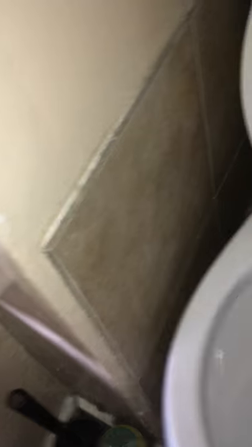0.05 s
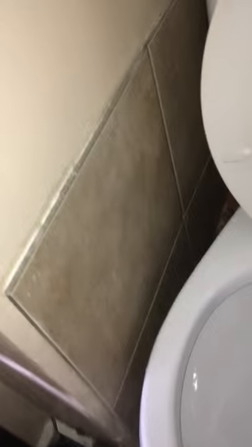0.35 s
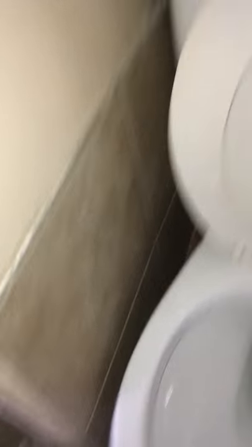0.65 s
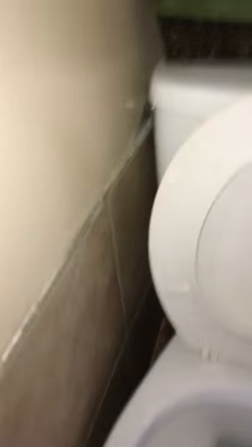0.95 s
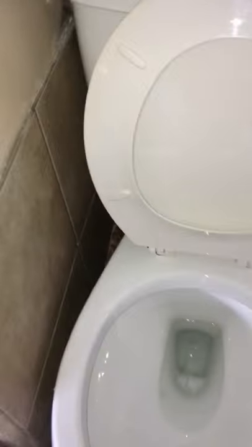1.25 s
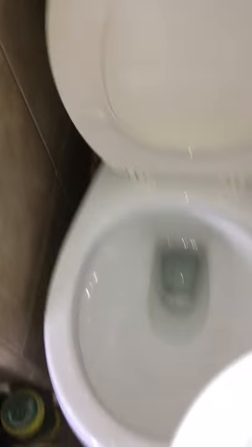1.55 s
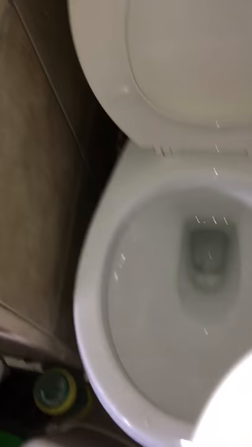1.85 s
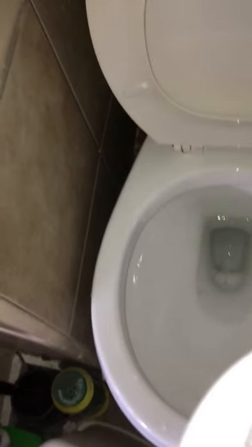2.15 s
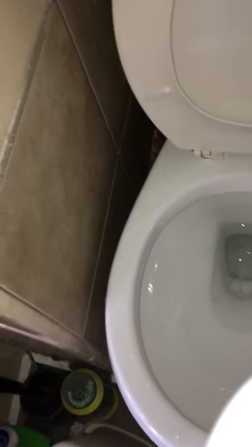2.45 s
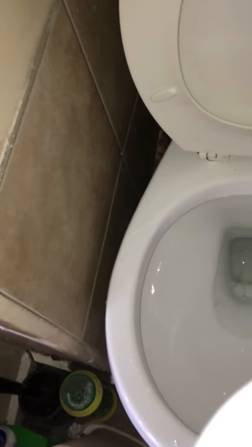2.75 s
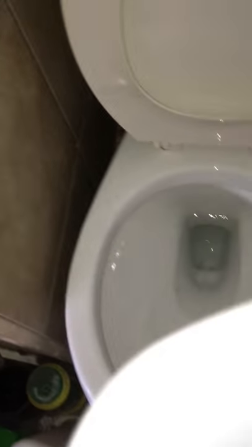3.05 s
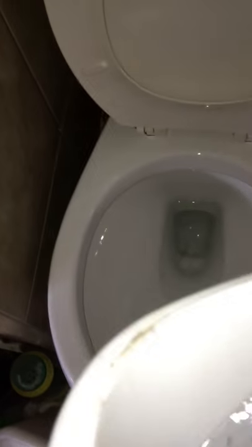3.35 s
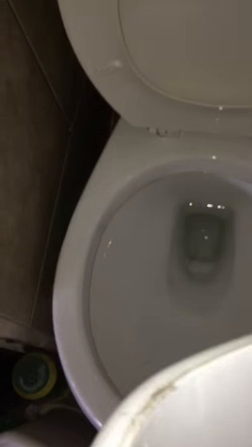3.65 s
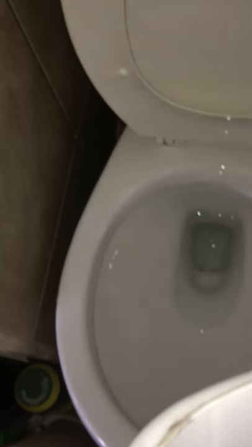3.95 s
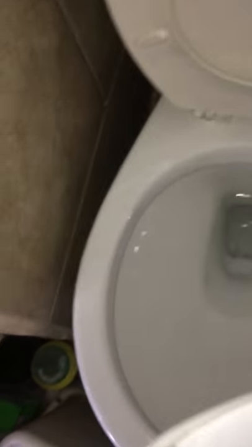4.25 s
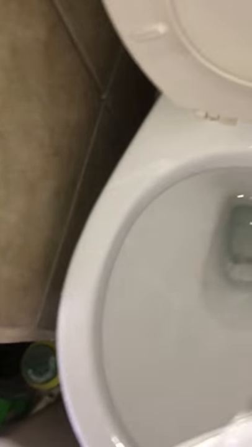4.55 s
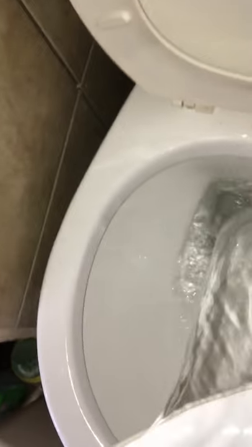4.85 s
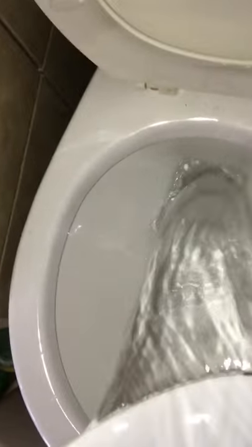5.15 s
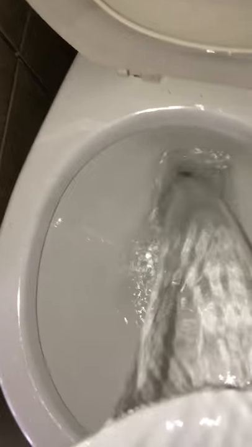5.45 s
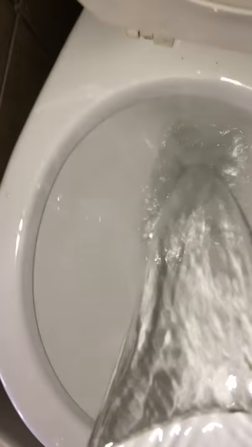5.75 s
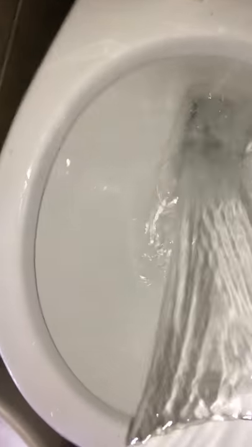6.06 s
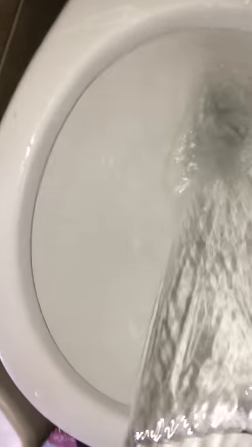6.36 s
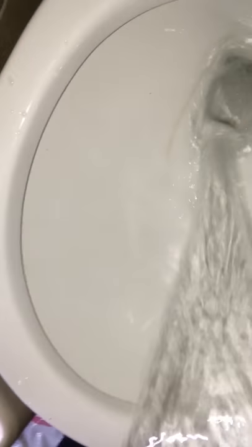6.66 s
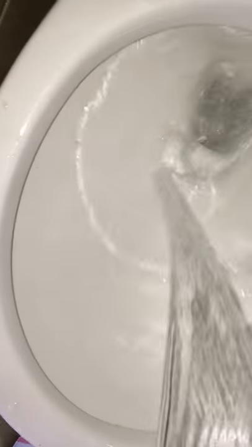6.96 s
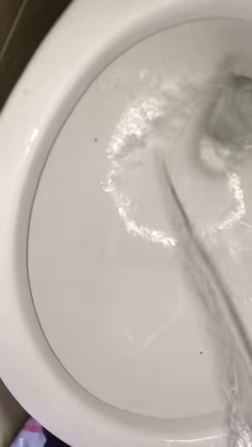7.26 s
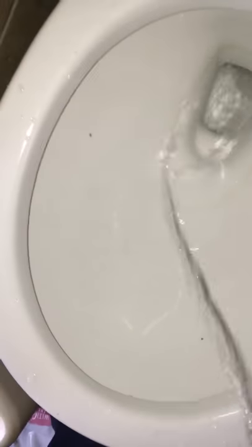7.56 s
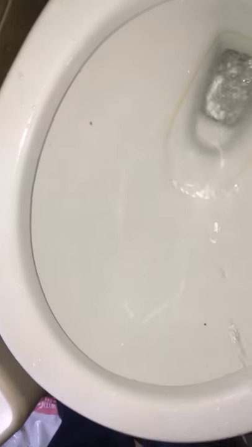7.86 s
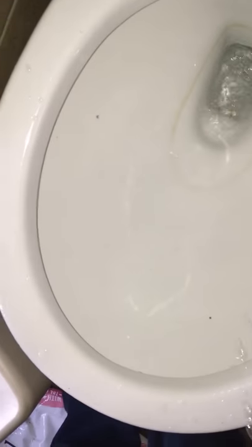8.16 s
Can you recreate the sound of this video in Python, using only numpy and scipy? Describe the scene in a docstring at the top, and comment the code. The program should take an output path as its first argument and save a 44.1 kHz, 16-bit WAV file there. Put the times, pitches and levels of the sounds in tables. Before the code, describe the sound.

A small tiled bathroom is quiet at first, with a low room rumble and a very faint rustle. A muffled engine drones outside, loudest around 2 seconds, then slowly draws away. Far traffic and a few faint chirps sit beneath it. From about 3.5 to 4.3 seconds a plastic bucket ticks and rubs softly as it tilts. The first drops smack the porcelain at 4.7 seconds, and a loud, close rush of water plunges into the toilet, splashing, spraying and bubbling with a short bright echo. Low glugs and drain rumble join around 5.5 seconds. The pour eases near 6 seconds, then swells again. From about 7 to 8 seconds the drain gulps air in loud, hollow glugs that ring the bowl, while the stream thins to a dribble and a few last drips.

```python
"""A small tiled bathroom: a bucket of water is tipped into the toilet while an engine drones outdoors.
The bucket creaks as it tilts; the sheet of water slaps the porcelain, sprays and beats bubbles
into the pool. The trap gulps air in loud glugs that ring the bowl, and the pour thins to a dribble.
A brief opening rustle, far traffic, a few faint chirps and soft room tone sit underneath."""
import sys
import numpy as np
from scipy import signal
from scipy.fft import rfft, irfft
from scipy.io import wavfile
from scipy.ndimage import uniform_filter1d

SR = 44100
rng = np.random.default_rng(int(sys.argv[2]) if len(sys.argv) > 2 else 0)


def materialize(psi):
    """Save the field psi as 16-bit PCM at rate SR to the path in sys.argv[1].

    A 1-D psi becomes a single channel; in a 2-D psi each row is a channel.
    """
    bounded = np.clip(np.atleast_2d(psi).T, -1, 1)
    quanta = np.round(bounded * 32767).astype(np.int16)
    wavfile.write(sys.argv[1], SR, quanta)


N = 362061
TIME = np.arange(N) / SR
CUTOFF_HZ = 16000


# the pour swells, eases, swells again and runs out: (time [s], bubbling [dB], spray [dB], churn [dB])
POUR = [(4.83, -38.5, -33.5, -47), (5.0, -32, -35, -41), (5.35, -31, -32, -39), (5.72, -34, -35, -33),
        (5.9, -35.5, -38, -42), (6.1, -37, -40, -39.5), (6.35, -32, -32.5, -32.5), (6.55, -31.5, -37, -33),
        (6.9, -32, -29, -35), (7.25, -33.5, -29.5, -35.5), (7.45, -36.5, -31, -43.5),
        (7.62, -37, -33.5, -42), (7.72, -46.5, -43.5, -50), (7.95, -49.5, -46.5, -52),
        (8.05, -58.5, -61, -63), (8.21, -54, -60, -60)]
# gobs slop over the bucket's lip: (time [s], length [s], bubbling [dB], spray [dB])
GOBS = [(4.831, 0.041, -32, -31.5), (4.878, 0.0087, -27.5, -31.5), (5.305, 0.087, -32, -34),
        (5.377, 0.0075, -32, -28.5), (5.74, 0.061, -34.5, -50), (5.85, 0.021, -40.5, -28),
        (6.17, 0.069, -33, -43), (6.42, 0.059, -29, -35.5), (6.78, 0.059, -27.5, -30.5),
        (7.14, 0.036, -37.5, -29), (7.456, 0.0039, -45, -23.5), (7.535, .05, -31.5, -38.5),
        (7.635, 0.033, -42.5, -33.5), (7.735, .035, -36, -47), (7.808, 0.0099, -35, -38),
        (7.847, .015, -46, -38), (7.917, 0.028, -38, -36), (8.124, .03, -46, -48.5)]
# the bowl's EQ on the slapping sheet: (frequency [Hz], gain [dB])
SHEET_EQ = [(300, -27), (850, -9), (1050, -1), (1260, 12.5), (1500, -8.5), (1850, 7.5), (2200, 5.5),
            (2800, 4.5), (3400, 4), (4200, -0.5), (5000, -2), (9000, -27)]
# chiming EQ of the small bubbles: (frequency [Hz], gain [dB])
CHIME_EQ = [(700, -9), (1080, 3.5), (1255, 2), (1480, -0.5), (1690, 3.5), (1850, 3.5), (2020, 4.5),
            (2195, 1.5), (2400, 6), (2700, 7.5), (3400, 5.5), (4200, 4), (4900, -1)]
def splash():
    """The stream shatters on porcelain and beats small bubbles into the pool; more water, more drops."""
    bubbling_db, spray_db, _ = in_time(POUR)
    gobs = swells(GOBS, attack_s=.0034, release_s=.06)
    bubbling, spraying = np.hypot(from_db([bubbling_db, spray_db]), gobs)
    density = 2600 * bubbling / from_db(-32)   # full flow is -32 dB
    tilt_db = -.43 + .54 * (spray_db - bubbling_db)   # per octave; brighter on bare porcelain
    clumps = from_db(1.42 * drift(55))   # the water arrives in lumps
    fizz = bubble_cloud(.2 * density, 7893, octaves=.6, cycles=30, spread_db=8, rise=.02)
    sheet = evened(colour(impacts(2 * density, spread_db=2.5) * clumps, SHEET_EQ))
    bubbles = bubble_cloud(.3 * density, 1964.48, octaves=.55, cycles=30, spread_db=5, rise=.03)
    bubbles = evened(colour(bubbles, CHIME_EQ))
    top = spraying * (from_db(-1) * spray(density, tilt_db) * clumps + from_db(-12.5) * fizz)
    body = bubbling * (from_db(-2.5) * bubbles + from_db(-5) * sheet)
    return gate(POUR) * (top + body)


# sizzle of the spray: (frequency [Hz], gain [dB])
SPRAY_EQ = [(900, -11.5), (2000, -11), (3000, 0), (4100, 3.5), (4800, -5), (5700, 3), (6700, 3.5),
            (7700, -2), (9000, 3.5), (10400, -2), (11400, 2.5), (13000, 2.5), (15800, 0.5), (17500, -89)]
def spray(density, tilt_db):
    """Drops burst with a short crackle: big ones across the treble, small ones each in its own band."""
    out = 0
    big_drops = impacts(.6 * density, spread_db=3) ** 2
    edges = np.geomspace(1500, CUTOFF_HZ, 11)
    decay = np.exp(-1 / (.0013 * SR))   # a drop takes a moment to spread
    for low, high in zip(edges, edges[1:]):
        energy = .4 * big_drops + impacts(.4 * density, spread_db=5) ** 2 + .001
        crackle = np.sqrt(signal.lfilter([1], [1, -decay], energy)) * rng.standard_normal(N)
        band = butter(crackle, 2, [low, high], "band")
        out = out + band * from_db(tilt_db * np.log2(high / 10000))
    return evened(colour(out, SPRAY_EQ))


# big air pockets: (time [s], relative level [dB], pitch [Hz], nominal decay [s], knock [dB])
GLUGS = [(5.428, -22, 191, .06, -53), (5.529, -10, 125.2, 0.07, -47), (5.724, -21.5, 130.1, .065, -28.5),
         (5.838, -18, 188, .066, -46.5), (6.06, -20.5, 190, 0.043, -43), (6.419, -22.5, 424, 0.04, -20),
         (6.904, -26, 570.6, .022, -21.5), (6.938, -14, 276.6, 0.037, -47.5),
         (6.955, -16.5, 313, 0.16, -24), (7.021, -10.5, 271, 0.06, -23), (7.030, -6.5, 263, 0.028, -39),
         (7.057, -7, 372, 0.024, -16), (7.068, -8.5, 373, .034, -21), (7.086, -3, 330, 0.021, -22.5),
         (7.094, -14, 570, 0.043, -27), (7.176, -21, 308.3, 0.066, -20.5), (7.385, -44, 454, 0.032, -22),
         (7.447, -15.5, 243.8, 0.032, -42), (7.534, -5, 272, 0.038, -39), (7.554, -1, 274, 0.022, -19.5),
         (7.574, -6.5, 311, 0.034, -11.5), (7.583, -9.5, 304, 0.023, -17.5), (7.641, -10, 337, 0.044, -17),
         (7.669, -6.5, 336, 0.031, -16), (7.712, -18, 310, 0.099, -33), (7.831, -15.5, 370, 0.036, -50),
         (7.863, -5.5, 317, .11, -12.5), (7.94, -13, 305.4, 0.014, -23), (8.056, -27.5, 162, 0.041, -51),
         (8.124, -23, 169, 0.054, -43)]
# bright single bubbles: (time [s], relative level [dB], pitch [Hz])
PLINKS = [(4.855, -22, 1320), (6.858, -23, 915), (6.906, -18.5, 1180), (7.015, -24, 1240),
          (7.404, -24, 1207), (7.463, -22.5, 2500), (7.472, -26.5, 2310), (7.733, -27.5, 1230),
          (7.741, -28.5, 1940), (7.809, -27.5, 2010), (7.943, -36.5, 4430), (7.949, -41, 5740),
          (8.102, -46, 599)]
def glugs():
    """Each air pocket throbs, heaves the pool and knocks the bowl; small bubbles plink on top."""
    out, knocks = np.zeros(N), np.zeros(N)
    for (s, db, hz, decay_s, knock_db), jitters in zip(GLUGS, rng.standard_normal((len(GLUGS), 4))):
        add(out, s, from_db(db) * bubble(hz, .69 * decay_s, rise=.02))
        add(out, s, from_db(db - 30.5) * bubble(hz=68, t60=.1, rise=.086))   # the heave
        for swing, jitter in enumerate(jitters):   # one knock on each early swing
            age = swing * (1 + .064 * jitter) / hz
            add(knocks, s + .001 + age, from_db([knock_db - 4 - 90 * age / decay_s]))
    for s, db, hz in PLINKS:
        add(out, s, from_db(db + 3.5) * bubble(hz, t60=.02, rise=.027))
    return out + bowl(knocks)


# the trap swallows in bouts: (time [s], length [s], churn [dB], drain rumble [dB])
GULPS = [(5.41, 0.57, -61, -31), (6.97, 0.27, -29.5, -31), (7.55, 0.069, -22, -26.5),
         (7.66, .11, -29.5, -42), (7.875, 0.053, -30.5, -28), (8.06, 0.16, -53.5, -31)]
# the bowl's hollow EQ on its bubbles: (frequency [Hz], gain [dB])
HOLLOW_EQ = [(120, -8), (215, -7.5), (255, -1.5), (316, -1), (358, -10.5), (403, 2), (500, -6), (586, -2),
             (660, -5), (735, 6.5), (800, -11), (880, -3), (1050, -8.5)]
# low end of the drain: (frequency [Hz], gain [dB])
DRAIN_EQ = [(20, -53), (45, -24), (75, -2), (110, 1.5), (160, -9), (205, 1.5), (260, -6.5), (400, -21),
            (1000, -65.5)]
def churn():
    """Larger bubbles tumble and sound the bowl over the drain's rumble; both swell as the trap gulps."""
    _, _, churn_db = in_time(POUR)
    steady = from_db([churn_db, churn_db - 6.5])   # between gulps the drain sits under the churn
    churning, rumbling = np.hypot(steady, swells(GULPS, attack_s=.038, release_s=.088))
    hollow = evened(bowl(impacts(500, spread_db=4)))
    tumbling = bubble_cloud(300, 453.4, octaves=.591, cycles=8.6, spread_db=3, rise=.071)
    tumbling = evened(colour(tumbling, HOLLOW_EQ))
    rumble = evened(colour(impacts(250, spread_db=4.5), DRAIN_EQ))
    pool = churning * (from_db(-4) * hollow + from_db(-3.5) * tumbling)
    return gate(POUR) * (pool + rumbling * from_db(-4) * rumble)


# air modes of the bowl and trap: (frequency [Hz], gain [dB], ring time [s])
BOWL_MODES = [(230, -14, 0.039), (316.4, -3, 0.11), (409, -12.5, 0.13), (582, -4, 0.056), (771, -2, 0.033),
              (864, -4.5, 0.031), (1240, -27, 0.028), (1233, 1, 0.06), (1838.6, -8, 0.044)]
def bowl(x):
    """The air in the bowl rings with whatever excites it; water damps the treble."""
    out, drive = 0, np.diff(x, prepend=0) + 1e-18
    for k, (hz, db, t60) in enumerate(BOWL_MODES):
        radius, angle = from_db(-60 / (t60 * SR)), 2 * np.pi * hz / SR
        ring = signal.lfilter([1], [1, -2 * radius * np.cos(angle), radius ** 2], drive)
        out = out + (-1) ** (k // 2) * from_db(db) * ring
    return butter(out, 4, 1400, "low")


# wet accents: (time [s], relative level [dB], band centre [Hz])
SLAPS = [(4.7506, -20, 11300), (4.7655, -24, 5500), (4.784, -35, 2140), (4.8004, -26, 9600),
         (4.813, -22, 7000), (4.8454, -22, 3340), (5.7775, -12, 6500), (5.869, -16, 5740),
         (6.0363, -18, 6214), (6.0803, -12.5, 6600), (6.1862, -14, 2960), (6.2058, -18, 3216),
         (6.5948, -6, 15300), (6.6649, -15, 4130), (7.0948, -15, 6260), (7.155, -15, 11780),
         (7.3427, -6, 12680), (7.4567, -5, 11300), (7.5257, -12.5, 14140), (7.551, -9, 14900),
         (7.656, -17, 6420), (7.7186, -19.5, 9180), (7.8073, -18.5, 11900), (7.9958, -34.5, 3510)]
def slaps():
    """Larger drops smack the porcelain, each with its own brightness."""
    out = np.zeros(N)
    for s, db, hz in SLAPS:
        band = [hz / 1.49, min(hz * 1.44, .45 * SR)]
        smack = burst(t60=.045)
        for _ in range(2):
            smack = butter(smack, 1, band, "band")
        add(out, s, from_db(db - 4.5) * smack / np.abs(smack).max())
    return out


# fader ride of the bubble plume: (time [s], level [dB])
PLUME = [(4.92, -45), (4.98, -31), (5.2, -35), (5.3, -44), (5.45, -53)]
def plume():
    """Plunging into still water, the sheet drives down a dense cloud of bubbles of nearly one size."""
    cloud = bubble_cloud(1500, 1900, octaves=.16, cycles=25, spread_db=3, rise=.02)
    return gate(PLUME) * from_db(in_time(PLUME)[0]) * cloud


def plunge():
    """The cavity behind the first sheet of water grows, so its ring dives in pitch."""
    start_hz, end_hz, growth_s, t60 = 515, 190, .0108, .092
    t = TIME[:int(t60 * SR)]
    hz = end_hz + (start_hz - end_hz) * np.exp(-t / growth_s)
    cycles = np.cumsum(hz) / SR
    envelope = (1 - np.exp(-cycles)) * from_db(-26 - 60 * (t / t60) ** 2)
    out = np.zeros(N)
    add(out, 4.867, np.sin(2 * np.pi * cycles) * envelope)
    return out


# the bucket shifts in the hand: (time [s], length [s], relative level [dB])
RUBS = [(3.6, 0.69, -68.5), (3.7, 0.049, -66), (3.86, 0.077, -61), (4.19, 0.038, -60.5)]
# dull body of the rub: (frequency [Hz], gain [dB])
RUB_EQ = [(30, -28), (90, -6), (180, 18), (300, 4), (600, -9.5), (1500, -15), (5000, -26), (16000, -24)]
# creaking ticks: (time [s], relative level [dB])
CREAKS = [(0.1436, -53.5), (0.2633, -53.5), (3.5688, -44.5), (3.6253, -50), (3.7198, -45), (3.7344, -51),
          (3.8332, -47), (3.8848, -52), (3.898, -42), (3.9073, -45), (3.9145, -40), (4.225, -54)]
# plastic tone of the ticks: (frequency [Hz], gain [dB])
PLASTIC_EQ = [(200, -40), (600, 17), (1100, -9), (1520, 14), (1850, -7), (2350, 14), (3000, -4),
              (4200, 2.5), (6500, -18), (8500, -4), (11000, -8), (16000, -9)]
def bucket():
    """The plastic ticks and rubs as it is tilted."""
    rubbing, = swells(RUBS, attack_s=.037, release_s=.13)
    friction = colour(impacts(900, spread_db=1.5), RUB_EQ)
    rub = friction / np.sqrt(np.mean(friction ** 2)) * rubbing * from_db(8.5)
    ticks = np.zeros(N)
    for s, db in CREAKS:
        add(ticks, s, from_db(db + 14.5) * burst(t60=.021))
    return rub + colour(ticks, PLASTIC_EQ)


# airy tone of the swish: (frequency [Hz], gain [dB])
SWISH_EQ = [(600, -13), (1600, 1), (2600, 0), (2900, 5), (3200, -1), (5000, -5), (6300, -6), (10000, -10),
            (15000, -5)]
def swish():
    """One soft brush of noise swells and fades while the bucket is lifted."""
    peak_s, width_s = 1.98, .19
    envelope = from_db(-67.5) * np.exp(-((TIME - peak_s) / width_s) ** 2)
    return envelope * colour(rng.standard_normal(N), SWISH_EQ)


# a slow pull through one gear, with a shift before and after: (time [s], speed [cycles/s])
ENGINE_SPEED = [(0, 17.5), (.25, 19.4), (.5, 13.9), (.7, 13.85), (1.5, 15.14), (3.05, 15.87), (4.65, 17.3),
                (5.1, 13.3), (8.21, 13.6)]
# the engine comes near and draws away: (time [s], level [dB])
ENGINE_PASS = [(0, -51), (.4, -47.5), (.6, -43), (1.0, -45), (1.9, -36), (2.5, -42.5), (2.97, -42),
               (3.15, -48.5), (5.4, -49.5), (8.21, -59)]
# exhaust harmonics: (order [multiple of speed], level [dB])
ENGINE_ORDERS = [(3, -14.5), (5, 0), (7, -18.5), (8, -.5), (10, -19.5), (13, -20.5), (16, -23.5),
                 (18, -25.5), (19, -33.5), (21, -26.5)]
# the room's bass resonances: (frequency [Hz], gain [dB])
ROOM_BASS = [(40, 1), (76, 0.5), (96, -1), (106, 9), (111, 6), (116, -0.5), (140, -2.5), (180, -7),
             (210, -4), (222, 6), (231, 11), (245, 0), (262, -5.5), (280, 5), (300, -4), (330, 2)]
def engine():
    """Only low exhaust orders come through the wall; each blooms as it crosses a room resonance."""
    (speed,), (level_db,) = in_time(ENGINE_SPEED), in_time(ENGINE_PASS)
    phase = 2 * np.pi * np.cumsum(speed * (1 + .0041 * drift(6.5))) / SR
    out = 0
    for order, db in ENGINE_ORDERS:
        room_db = np.interp(order * speed, *np.transpose(ROOM_BASS))
        waver_db = -.064 * db * drift(2.325)   # weaker orders waver more
        tone = np.sin(order * phase + 2 * np.pi * rng.random())
        out = out + from_db(level_db + db + room_db + waver_db) * tone
    return out


# distant chirps: (time [s], relative level [dB], base pitch [Hz])
CHIRPS = [(0.766, -57.5, 2720), (1.409, -63, 1100), (2.61, -61, 1399), (3.22, -54.5, 1078),
          (4.471, -53.5, 1085)]
def chirps():
    """Each faint chirp is a short, rough, rising tone, blurred by its echoes."""
    out, t = np.zeros(N), TIME[:SR // 3]
    envelope = t / .026 * np.exp(1 - t / .016)
    for s, db, hz in CHIRPS:
        pitch = hz - 70 + 2500 * np.minimum(t, .06) + 800 * rng.standard_normal(len(t))
        add(out, s, from_db(db) * np.sin(2 * np.pi * np.cumsum(pitch) / SR) * envelope)
    return out + from_db(2.5) * signal.fftconvolve(out, burst(t60=.49))[:N]


# a soft rustle for the first 0.3 s, then far traffic: (time [s], relative level [dB])
RUSTLE_AND_TRAFFIC = [(0, -66), (.28, -65), (.4, -74), (1.5, -76), (2.5, -72.5), (3.2, -69), (3.9, -65.5),
                      (4.5, -72)]
# midrange tone of both: (frequency [Hz], gain [dB])
WASH_EQ = [(300, -17.5), (600, -2.5), (830, 0.5), (1000, -5), (1150, -3), (1500, -12), (1850, -11.5),
           (3000, -26), (8000, -48)]
def rustle_and_traffic():
    """A brief soft rustle at the start, then a faint midrange wash of far traffic that slowly swells."""
    return from_db(in_time(RUSTLE_AND_TRAFFIC)[0] - 3) * colour(rng.standard_normal(N), WASH_EQ)


# the quiet bed: (frequency [Hz], gain [dB])
ROOM_TONE_EQ = [(15, -50), (25, -16), (61, -7.5), (97, -1), (137, -6.5), (170, -18), (236, -15.5),
                (516, -33), (754, -39), (3160, -43), (4870, -49), (5880, -46.5), (10400, -49),
                (14800, -42.5), (16000, -65)]
def room_tone():
    """A steady low rumble with a trace of hiss."""
    return from_db(-52.5) * colour(rng.standard_normal(N), ROOM_TONE_EQ)


def bathroom(x, wet_db):
    """Close tiled walls return a short bright tail."""
    out = x.copy()
    add(out, .004, from_db(wet_db) * signal.fftconvolve(x, burst(t60=.31)))
    return out


def bubble(hz, t60, rise):
    """A bubble swells within a cycle, holds, then rings down, rising in pitch as it nears the surface."""
    t = TIME[:int(t60 * SR) + 2]
    envelope = from_db(-60 * (t / t60) ** 1.67) * (1 - np.exp(-3 * hz * t))
    return np.cos(2 * np.pi * hz * t * (1 + rise * t / t60)) * envelope


def bubble_cloud(per_s, centre_hz, octaves, cycles, spread_db, rise):
    """Bubbles born at random during the pour, scattered about a typical pitch."""
    out = np.zeros(N)
    births = np.flatnonzero(rng.random(N) < per_s * gate(POUR) / SR)
    for at, (pitch, loud, life) in zip(births, rng.standard_normal((N // 20, 3))):
        hz = min(centre_hz * 2 ** (octaves * pitch), CUTOFF_HZ)
        t60 = cycles / hz * from_db(6.7 * life)
        add(out, at / SR, from_db(spread_db * min(loud, 2)) * bubble(hz, t60, rise))
    return evened(out)


def impacts(per_s, spread_db):
    """Random clicks of uneven size."""
    sizes = from_db(spread_db * np.minimum(rng.exponential(1, N), 4.5)) * rng.choice([-1, 1], N)
    return sizes * (rng.random(N) < per_s / SR)


def burst(t60):
    """Dying noise of unit energy."""
    t = TIME[:int(t60 * SR) + 2]
    noise = rng.standard_normal(SR)[:len(t)] * from_db(-60 * t / t60)
    return noise / np.linalg.norm(noise)


def drift(rate):
    """Random modulator with a spread of about 1."""
    knots = rng.standard_normal(N // 20)
    return 1.22 * np.interp(TIME * rate * 2, np.arange(len(knots)), knots)


def swells(rows, attack_s, release_s):
    """One envelope per level column: each cue rises, holds, then falls 60 dB over the release."""
    gains = 0
    for s, length, *db in rows:
        attack = np.clip((TIME - s) / attack_s + 1, 0, 1)
        release = from_db(-60 * np.clip((TIME - s - length) / release_s, 0, 3))
        gains = gains + np.outer(from_db(db), attack * release)
    return gains


def gate(rows):
    """Open while a curve lasts, with quick fades."""
    start, end = rows[0][0], rows[-1][0]
    return np.interp(TIME, [start - .002, start, end + .03, end + .06], [0, 1, 1, 0])


def in_time(rows):
    """Each column of a curve at every sample."""
    s, *columns = np.transpose(rows)
    return [np.interp(TIME, s, c) for c in columns]


def colour(x, eq, size=4096):
    """Minimum-phase EQ of unit power."""
    hz, db = np.transpose(eq)
    curve_db = np.interp(np.log(np.linspace(1, SR / 2, size + 1)), np.log(hz), db)
    cepstrum = irfft(np.log(from_db(curve_db)))
    response = irfft(np.exp(rfft(np.r_[0, 2 * cepstrum[1:size], np.zeros(size)])))
    return signal.fftconvolve(x, response / np.linalg.norm(response))[:N]


def butter(x, order, hz, kind):
    """Low-, high- or band-pass filter."""
    return signal.sosfilt(signal.butter(order, hz, kind, fs=SR, output="sos"), x)


def evened(x):
    """Leveller with a window of about 80 ms; single grains still stand out."""
    return x / np.sqrt(np.abs(uniform_filter1d(x ** 2, 3500)) + .01 * np.mean(x ** 2))


def add(out, s, sound):
    """Mix a sound in at a time."""
    at = max(0, round(s * SR))
    out[at:at + len(sound)] += sound[:max(0, N - at)]


def from_db(db):
    """Decibels to gain."""
    return 10 ** (np.asarray(db) / 20)


def scene():
    """Mono mix: splashes and bucket up front, the pool with less reverb, the background beneath."""
    splashes = bathroom(splash() + plume() + slaps() + bucket(), wet_db=-8)
    pool = bathroom(plunge() + churn() + glugs(), wet_db=-12.5)
    bed = room_tone() + rustle_and_traffic()
    return (splashes + pool + bed + swish() + engine() + chirps())[None]


def record(dry):
    """Master chain: sub-bass roll-off, soft clipping and a steep top cut."""
    rounded = np.tanh(butter(dry, 2, 38, "high"))
    return signal.sosfilt(signal.ellip(10, .1, 80, CUTOFF_HZ, fs=SR, output="sos"), rounded)


dry = scene()
out = record(dry)
materialize(out)
```